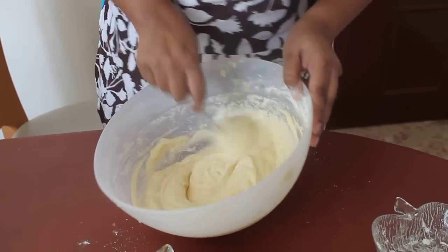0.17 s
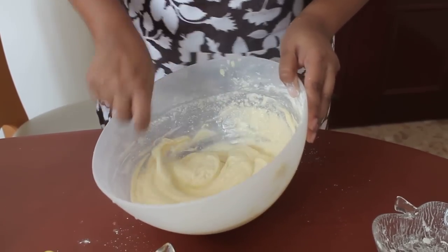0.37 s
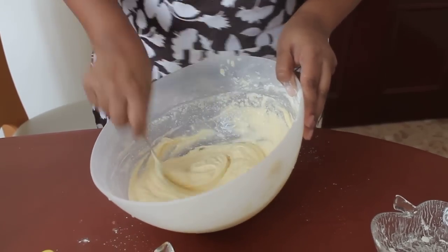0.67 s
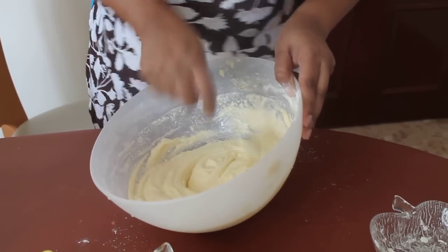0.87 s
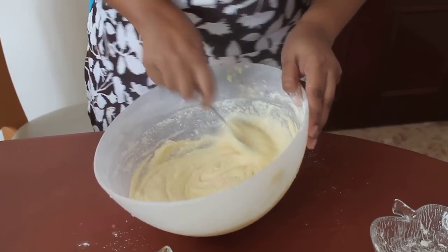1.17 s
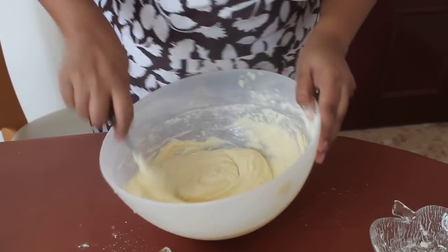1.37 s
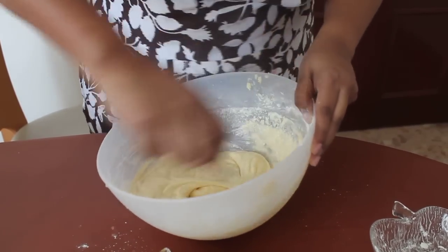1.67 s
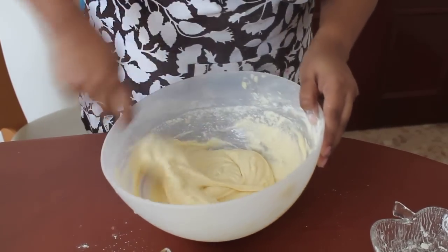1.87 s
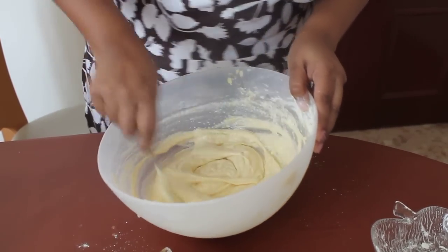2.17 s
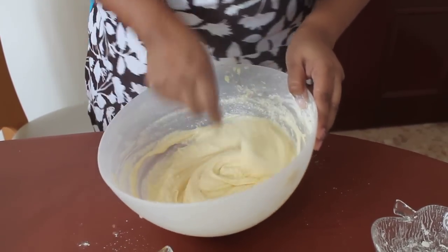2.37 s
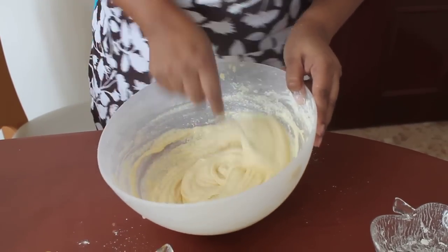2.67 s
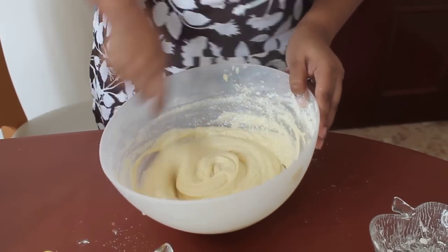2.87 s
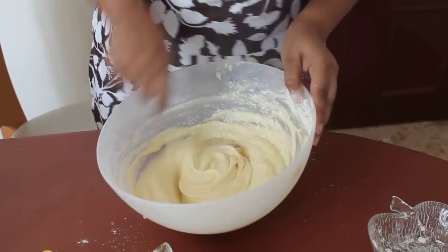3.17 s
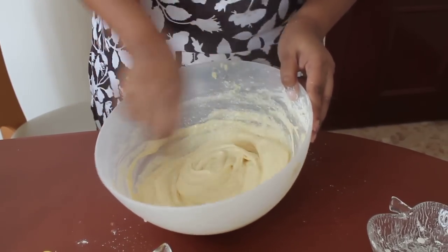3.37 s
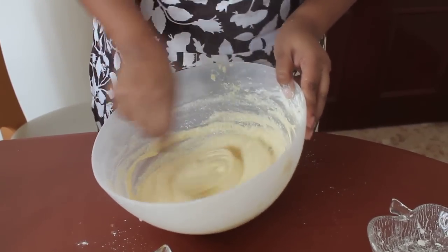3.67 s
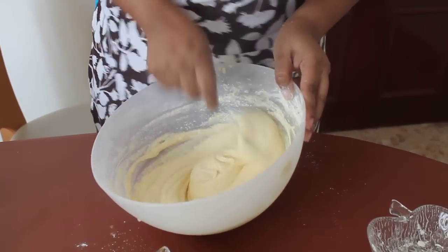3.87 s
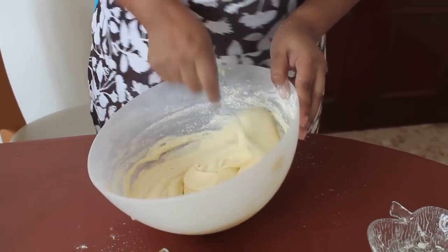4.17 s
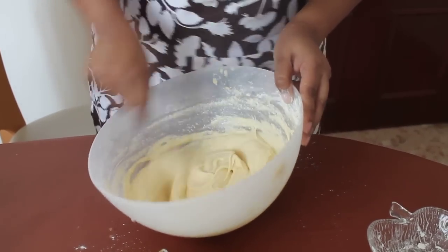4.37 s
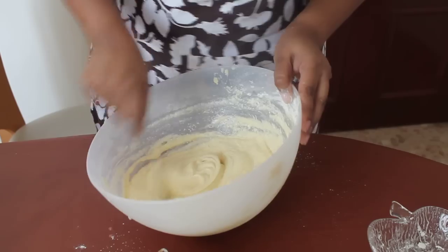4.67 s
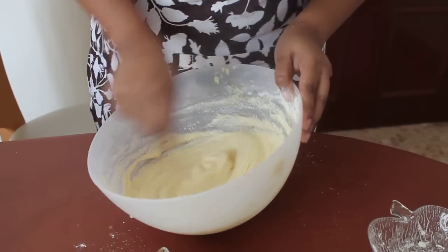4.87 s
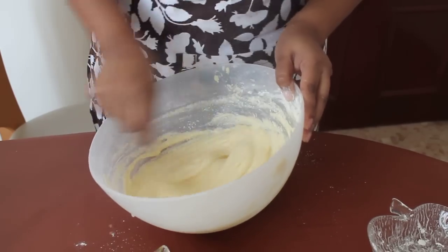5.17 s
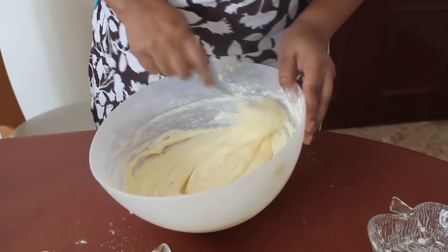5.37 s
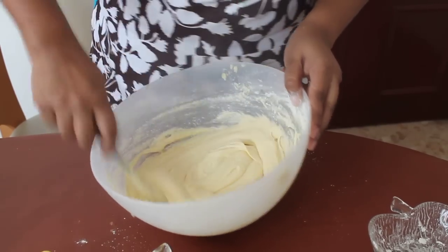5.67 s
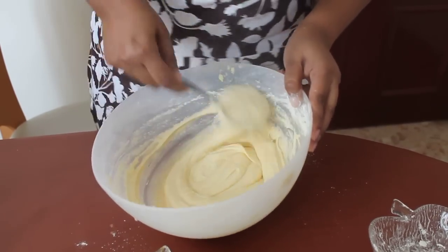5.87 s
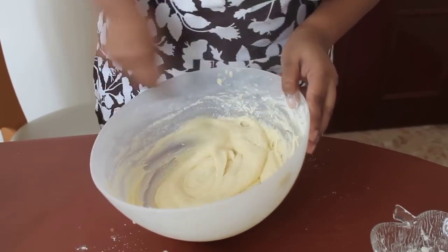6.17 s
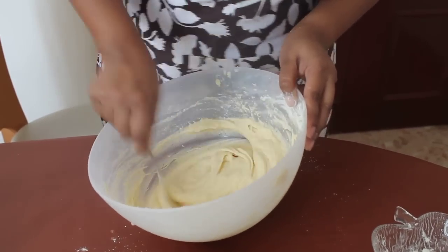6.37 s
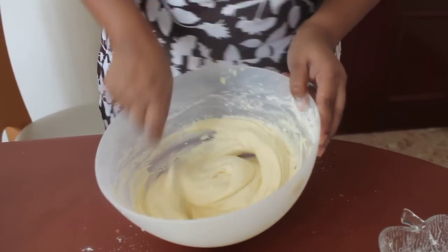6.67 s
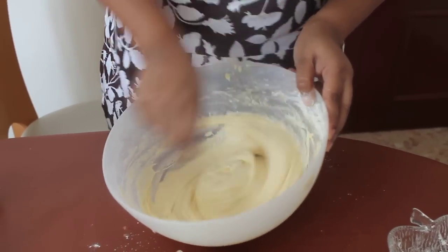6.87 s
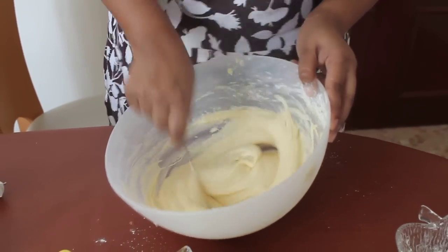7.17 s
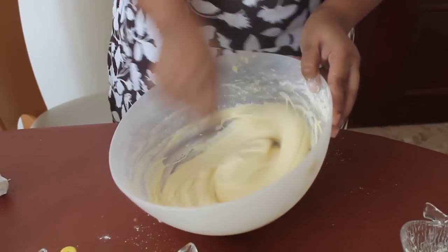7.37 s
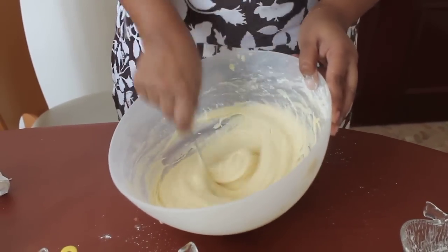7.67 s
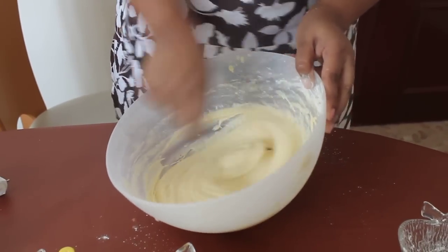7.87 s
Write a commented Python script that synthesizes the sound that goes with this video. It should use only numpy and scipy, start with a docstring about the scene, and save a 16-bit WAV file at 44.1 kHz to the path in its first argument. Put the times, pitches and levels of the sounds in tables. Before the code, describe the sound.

Thick batter squelches and crackles as a spoon stirs it briskly, knocking against a plastic bowl in an echoing kitchen.

```python
"""A metal spoon knocks around a plastic bowl of thick batter, about three turns a second, harder toward
the end. After each knock the spoon drags on: sticky films tear with a crackle, and an air pocket opens
behind it with a squelch. Smacks, small pops and three slow scrapes come in between, and the bowl bumps
the table once. A bare kitchen echoes it all over a faint, steady hush."""
import sys
import numpy as np
from scipy import signal
from scipy.fft import rfft, irfft, next_fast_len
from scipy.io import wavfile
from scipy.ndimage import uniform_filter1d, map_coordinates

SR = 44100
rng = np.random.default_rng(int(sys.argv[2]) if len(sys.argv) > 2 else 0)


def store_pcm(level_fs):
    """Save levels as 16-bit WAV."""
    pcm = np.round(np.clip(level_fs, -1, 1) * 32767).astype(np.int16)
    wavfile.write(sys.argv[1], SR, np.atleast_2d(pcm).T)


N = 354123

# The tones of the bowl's wall: pitch_ratio, level_db, ring_s (time to fade by 60 dB)
BOWL_TONES = [(.58, -10.5, 0.042), (.75, -2.5, 0.018), (1, -2, 0.041), (1.42, -4, 0.0097),
              (2.6, -12.5, 0.045)]
# Each knock and the drag after it; depth runs from 0 (skimming) to 1 (buried):
# start_s, knock_db, hardness_db, bowl_pitch_hz, speed_up_s, drag_db, depth
STROKES = [(0.149, -19.5, 4, 492, 0.011, -24.5, 0.04), (0.486, -21.5, 11.5, 587, 0.056, -22.5, 0.39),
           (0.8473, -15, -7, 672, 0.019, -23.5, 0.21), (1.2133, -15, -3, 476, 0.011, -36, 0.2),
           (1.684, -25.5, 15, 475, 0.024, -36, 0.05), (2.3708, -13, 3, 456, 0.015, -20, 0.44),
           (2.6936, -15.5, 7, 430, 0.019, -23.5, 0.42), (2.9241, -23.5, 7, 640, 0.018, -23, .15),
           (2.986, -28, 15, 570, 0.017, -12.5, 0.52), (3.2594, -24, 12.5, 665, 0.03, -15.5, 0.34),
           (3.5643, -16, -7, 638, .034, -15.5, 0.38), (3.7898, -21, -5, 374, 0.054, -26.5, 0.45),
           (3.846, -20, -6, 655, 0.049, -11.5, 0.6), (4.1244, -24, 9, 686, 0.043, -11.5, 0.42),
           (4.4748, -13, 5, 496, 0.043, -18.5, 0.45), (4.8112, -9.5, 1.5, 450, 0.025, -15, 0.93),
           (5.0978, -13, 0.5, 436, 0.016, -22.5, 0.43), (5.4062, -18.5, 0, 446, 0.037, -40, 0.07),
           (6.4807, -19, -6, 454, 0.028, -21.5, 0.54), (6.518, -17, 8, 622, 0.024, -11.5, 0.39),
           (6.7231, -24, -3, 383, 0.0443, -28, 0.47), (6.8, -16.5, 5, 451, 0.016, -15, 0.32),
           (6.9911, -16, -1, 592, 0.057, -23.5, 0.57), (7.0671, -11.5, 6, 497, 0.015, -16, 0.26),
           (7.2456, -17.5, -5, 377, 0.071, -27.5, 0.28), (7.3172, -12, 6.5, 505, 0.0248, -14, 0.43),
           (7.4724, -17, 1, 508, 0.11, -26.5, 0.3), (7.5714, -10.5, 10.5, 423, 0.02, -17.5, .9),
           (7.7216, -15.5, 3, 484, 0.065, -25.5, 0.73), (7.8129, -8, 2.5, 474, 0.032, -18.5, .78),
           (7.9538, -17, 6, 476, 0.012, -23, 0.36)]
def knocks():
    """The spoon hits and the wall rings briefly. Hard hits crack and clack; batter-cushioned ones thud."""
    out, t = np.zeros(N), np.arange(4096) / SR
    for start_s, knock_db, hardness_db, bowl_hz, *_ in STROKES:
        crack = cut(rng.standard_normal(len(t)), "low", hz=6400, order=1)
        crack *= amp(hardness_db - 6.5 - 60 * t / 0.028)
        clack_hz = 1593 * np.exp(0.17 * rng.standard_normal())
        clack = amp(6.5 + 0.37 * hardness_db) * ring(t, clack_hz, ring_s=0.0062)
        contact = amp(4) * cut(clack + crack, "high", hz=620, order=2)
        thud = amp(-10 - 0.22 * hardness_db) * ring(t, hz=237, ring_s=0.023)
        thud = cut(thud, "high", hz=131, order=2)
        uneven_db = 1.5 * rng.standard_normal(len(BOWL_TONES))
        wall = sum((-1) ** k * amp(level_db + uneven_db[k]) * ring(t, ratio * bowl_hz, ring_s)
                   for k, (ratio, level_db, ring_s) in enumerate(BOWL_TONES))
        add(out, start_s - .0001, amp(knock_db) * (contact + amp(6.5) * wall + thud))
    return out


def drags(t):
    """After each knock the spoon ploughs on. Skimming, it crackles; buried, it squelches lower."""
    next_knocks = [row[0] for row in STROKES[1:]] + [np.inf]
    for (start_s, _, _, _, speed_up_s, drag_db, depth), next_s in zip(STROKES, next_knocks):
        # the batter brakes the spoon, or a quick next knock cuts the drag short
        slow_down_s = min(.06, .8 * (next_s - start_s - speed_up_s))
        speed_db, shut = pull(t, speed_up_s, slow_down_s)
        squelch_db = drag_db + speed_db
        crackle_db = squelch_db + np.interp(depth, [0, 1], [2.5, -20])
        fizz_db = crackle_db - 4 - 0.6 * start_s  # less fizz as the flour gets wet
        open_hz = np.interp(depth, [0, 1], [1893, 1190])
        yield start_s, crackle_db, fizz_db, squelch_db, open_hz, shut


# The spoon pulls free: start_s, length_s, level_db
SMACKS = [(2.123, 0.057, -27), (2.485, 0.032, -26), (2.981, 0.0096, -21.5), (3.095, .032, -24.5),
          (3.351, 0.065, -31), (3.411, 0.045, -19.5), (4.243, 0.081, -29), (4.297, 0.051, -20),
          (5.44, 0.0226, -31), (5.836, 0.022, -26), (6.153, 0.016, -19), (7.149, 0.027, -25),
          (7.201, 0.02, -27)]
def smacks(t, rise_share=0.383, open_hz=1770):
    """A short, fizzy pull as the batter lets go of the spoon."""
    for start_s, length_s, level_db in SMACKS:
        speed_db, shut = pull(t, rise_share * length_s, (1 - rise_share) * length_s)
        crackle_db = level_db + speed_db
        fizz_db, squelch_db = crackle_db - 3.5, crackle_db - 1.5
        yield start_s, crackle_db, fizz_db, squelch_db, open_hz, shut


# Slow scrapes along the coated wall, one list of points each: time_s, effort_db
SCRAPES = [
    [(1.71, -39.5), (1.792, -19), (1.834, -25.5), (1.878, -24.5), (1.896, -22), (2.044, -26), (2.11, -41)],
    [(5.57, -41), (5.61, -29), (5.698, -21), (5.812, -20), (5.866, -32.5), (5.878, -59), (5.9, -48)],
    [(6.168, -34), (6.19, -14), (6.202, -23), (6.24, -17.5), (6.34, -41)],
]
def scrapes(t, opening_share=0.68, open_hz=1760):
    """A thin coat tears off the wall. Batter gathers on the spoon, so the squelch grows and drops lower."""
    for curve in SCRAPES:
        times_s, efforts_db = np.transpose(curve)
        start_s, length_s = times_s[0], times_s[-1] - times_s[0]
        effort_db = np.interp(start_s + t, times_s, efforts_db, right=-120)
        shut = np.clip(1 - t / (opening_share * length_s), 0, 1)
        crackle_db, fizz_db = effort_db - 1, effort_db - 3
        squelch_db = effort_db + np.interp(shut, [0, 1], [-9.5, -12])
        yield start_s, crackle_db, fizz_db, squelch_db, open_hz, shut


def pull(t, rise_s, fall_s):
    """The spoon speeds up, then slows: gives its level and how shut the pocket behind it is (0 to 1)."""
    times_s = np.cumsum([0, .002, abs(rise_s), abs(fall_s), .04])
    entry_db = -7 * np.sqrt(abs(rise_s) / 0.02)  # a slower pull starts more quietly
    speed_db = np.interp(t, times_s, [-90, entry_db, 0, -17, -90])
    opening_s = 0.102 * (rise_s + fall_s)
    shut = (1 - np.tanh((t - rise_s) / opening_s + 0.56)) / 2  # opens just before the fastest moment
    return speed_db, shut


def batter():
    """Drags, smacks and scrapes together make the batter crackle, squelch and churn."""
    crackle, fizz, squelch, pitch_sum, shut_sum = np.zeros((5, N))
    t = np.arange(SR // 2) / SR
    for start_s, crackle_db, fizz_db, squelch_db, open_hz, shut in [*drags(t), *smacks(t), *scrapes(t)]:
        suction = amp(squelch_db)
        add(crackle, start_s, amp(crackle_db))
        add(fizz, start_s, amp(fizz_db))
        add(squelch, start_s, suction)
        add(pitch_sum, start_s, suction * open_hz)
        add(shut_sum, start_s, suction * shut)
    weight = squelch + 1e-12  # where moves overlap, the louder one shapes the pocket more
    films = sticky_films(crackle, fizz)
    cells = air_cells(open_hz=pitch_sum / weight, shut=shut_sum / weight)
    return amp(0.26) * films + amp(-6.5) * squelch * cells + churning(squelch)


# The tone of the crackle: pitch_hz, level_db
CRACKLE_TONE = [(300, -52), (900, -38), (1400, -11), (3000, 2.5), (4100, -3), (5400, 3), (7000, -1),
                (8300, 0), (9500, -4.5), (12000, -36)]
# The tone of the finer, higher fizz: pitch_hz, level_db
FIZZ_TONE = [(5000, -39), (8500, -5.5), (10000, 0.5), (13000, 1), (16000, -6)]
def sticky_films(crackle, fizz):
    """Thin films of batter tear in clumps as the spoon moves."""
    clumps = unit(amp(1.7 * wobble(per_s=330) + 1.2 * wobble(per_s=70)))
    coarse = amp(0.5) * crackle * tearing(CRACKLE_TONE, spread_db=-2)
    fine = amp(-1.5) * fizz * tearing(FIZZ_TONE, spread_db=-1.5)
    return clumps * (coarse + fine)


def tearing(tone, spread_db):
    """Parting films make thousands of tiny clicks, heard through shifting folds of batter."""
    starts = rng.integers(0, N, size=26000)
    pitch_hz = rng.uniform(650, 15400, len(starts))
    clicks = tiny_rings(starts, pitch_hz, ring_s=0.0012, spread_db=spread_db, samples=64)
    return patchy(coloured(clicks, tone), depth_db=2.8)


def air_cells(open_hz, shut):
    """A shut pocket squeezes its air cells to all sizes; as it opens they sink to one vowel-like pitch."""
    starts = rng.integers(0, N, size=11000)
    octaves_up = 1.9 * shut[starts] * rng.uniform(.5, 1, len(starts))
    octaves_up += .13 * rng.standard_normal(len(starts))
    pitch_hz = np.clip(open_hz[starts] * 2 ** octaves_up, 300, 15000)
    cells = tiny_rings(starts, pitch_hz, ring_s=0.0086, spread_db=4, samples=288)
    return cut(cells, "high", hz=1020, order=3)


# How strongly the batter churns: time_s, level_db
CHURN_LEVELS = [(0, -45.5), (3.6, -57.5), (4.102, -36), (4.598, -46.5), (6.4, -45), (6.8, -36.5),
                (7.1, -34), (7.6, -30), (8.03, -33)]
# The tone of the churning: pitch_hz, level_db
CHURN_TONE = [(30, -12), (80, -27), (130, -17), (250, -11), (450, 1), (550, -6), (650, -2), (870, -5.5),
              (1250, 3), (2200, -7), (5000, -13), (16000, -27.5)]
def churning(squelch):
    """Each move shakes the whole mass of batter, and fast beating keeps it churning."""
    churn_db = np.interp(np.arange(N) / SR, *np.transpose(CHURN_LEVELS)) + 2 * wobble(per_s=70)
    return (amp(-8) * squelch + amp(churn_db)) * coloured(rng.standard_normal(N), CHURN_TONE)


# Air pockets bursting: start_s, level_db, pitch_hz
AIR_POPS = [(1.7556, 3, 3540), (1.9011, 12.5, 3400), (1.9547, 5, 3040), (2.3348, -7, 2850),
            (2.621, 2.5, 4300), (4.4312, -2, 7000), (4.6664, -1, 2050), (5.3721, -9.5, 7800),
            (5.8654, 3, 2230), (6.0265, 1.5, 3440), (6.189, 6.5, 5200), (6.196, 12, 5900),
            (6.9713, 4, 4650)]
def pops():
    """Trapped air snaps open with a short click; so small a source has no bass."""
    out, t = np.zeros(N), np.arange(512) / SR
    for start_s, level_db, pitch_hz in AIR_POPS:
        snap = cut(rng.standard_normal(len(t)), "low", hz=6000, order=1) * amp(-4 - 60 * t / .004)
        add(out, start_s, amp(level_db - 7) * (ring(t, pitch_hz, ring_s=0.0015) + snap))
    return cut(out, "high", hz=1310, order=2)


# The two low tones of one bump: start_s, level_db, pitch_hz, ring_s
BUMP_TONES = [(5.317, -26, 204, 0.1), (5.318, -35, 107, .25)]
def table_bump():
    """The bowl's foot thuds softly on the table top."""
    out, t = np.zeros(N), np.arange(SR // 2) / SR
    for start_s, level_db, pitch_hz, ring_s in BUMP_TONES:
        add(out, start_s, amp(level_db) * ring(t, pitch_hz, ring_s))
    return out


def surface_bubbles():
    """Tiny bubbles on the batter burst at random with faint ticks."""
    starts = rng.integers(0, N, size=60)
    pitch_hz = rng.uniform(3000, 14000, len(starts))
    ticks = tiny_rings(starts, pitch_hz, ring_s=.0012, spread_db=4, samples=96)
    return amp(-65) * cut(ticks, "high", hz=2000, order=2)


# Bounces off the table and nearest walls: delay_s, level_db
NEAR_ECHOES = [(.0085, -23.5), (0.013, -16.5), (0.014, -20.5), (0.022, -30), (0.031, -18), (.039, -28)]
def first_echoes(sound):
    """Each nearby surface sends back one slightly dull copy."""
    out, dull = np.zeros(N), cut(sound, "low", hz=2300, order=1)
    for delay_s, level_db in NEAR_ECHOES:
        add(out, delay_s, amp(level_db) * dull)
    return out


# How long the kitchen rings: pitch_hz, ring_s
ROOM_RING = [(150, 0.89), (400, 0.58), (1040, 0.5), (2760, 0.57), (7280, 0.56), (15000, 0.32)]
# The tone of its echo: pitch_hz, level_db
ROOM_TONE = [(100, -8), (450, 3), (680, 8.5), (880, -2.5), (1200, -1.5), (1650, 0), (3500, -5.5),
             (8000, -9.5), (15000, -11.5)]
# Notes that build up between the walls (standing waves): pitch_hz, level_db, ring_s
ROOM_NOTES = [(123.8, 3.5, 1), (182.4, 3, 0.93), (377, 0, 0.8), (406, -10.5, 1), (457, 5, 0.63),
              (531, -2, 1), (645.7, 8, 0.54), (721, -0.5, 0.86)]
def kitchen(sound):
    """Hard walls answer. The echo pattern changes as spoon and bowl move; the room's own notes stay."""
    out, t = np.zeros(N), np.arange(28672) / SR
    band_hz, time_s, _ = signal.stft(t, SR, nperseg=256)
    fade = amp(-60 * time_s / value_at(ROOM_RING, band_hz)[:, None])
    band_energy = np.mean(fade ** 2, axis=1, keepdims=True) * len(t)
    fade *= amp(value_at(ROOM_TONE, band_hz))[:, None] / np.sqrt(band_energy)
    hop = SR // 14
    padded, window = np.pad(sound, (hop, 2 * hop)), signal.windows.cosine(2 * hop)
    for i in range(0, N, hop):  # each overlapping slice gets its own tail of fading noise
        noise_bands = signal.stft(rng.standard_normal(len(t)), nperseg=256)[2]
        tail = signal.istft(noise_bands * fade, nperseg=256)[1]
        echo = signal.fftconvolve(padded[i:i + 2 * hop] * window, tail)
        add(out, (i - hop) / SR + .004, echo[max(hop - i, 0):])
    notes = sum(amp(level_db) * ring(t, hz, ring_s) for hz, level_db, ring_s in ROOM_NOTES)
    return out + amp(-58) * signal.fftconvolve(sound, notes)[:N]


# The tone of the background: pitch_hz, level_db
HUSH_TONE = [(15, -49), (25, -26), (102, -11), (130, -2), (166, -1), (301, 3.5), (373, 0), (840, -1.5),
             (1790, -36), (4140, -50.5), (4870, -63), (10100, -26.5), (16000, -63)]
def room_hush():
    """A faint, low noise whose level wavers slightly."""
    return amp(-44 + 0.57 * wobble(per_s=6)) * coloured(rng.standard_normal(N), HUSH_TONE)


def amp(db):
    """Turn decibels into a gain."""
    return 10 ** (np.asarray(db) / 20)


def unit(x):
    """Scale to an average (rms) level of 1."""
    return x / np.sqrt(np.mean(x ** 2) + 1e-20)


def add(track, start_s, sound):
    """Mix a sound into a track."""
    i = max(round(start_s * SR), 0)
    track[i:i + len(sound)] += sound[:max(len(track) - i, 0)]


def ring(t, hz, ring_s):
    """A pure tone that fades by 60 dB in ring_s."""
    return np.sin(2 * np.pi * hz * t) * amp(-60 * t / ring_s)


def tiny_rings(starts, hz, ring_s, spread_db, samples):
    """Many short tones of uneven strength, one at each start sample."""
    offsets = np.arange(samples)
    strength = amp(spread_db * np.minimum(rng.exponential(size=len(starts)), 5))
    strength *= rng.choice([-1, 1], len(starts))
    tones = strength[:, None] * ring(offsets / SR, hz[:, None], ring_s)
    positions = starts[:, None] + offsets
    return unit(np.bincount(positions.ravel(), tones.ravel(), N + samples)[:N])


def wobble(per_s):
    """A smooth curve through per_s random values a second."""
    values = rng.standard_normal(int(N * per_s / SR) + 4)
    return map_coordinates(values, [np.arange(N) * per_s / SR])


def patchy(x, depth_db):
    """Make random patches of pitch swell and fade briefly."""
    bands = signal.stft(x, nperseg=256)[2]
    patches = rng.standard_normal(bands.shape)
    for _ in range(2):
        patches = uniform_filter1d(uniform_filter1d(patches, size=9, axis=0), size=4, axis=1)
    return unit(signal.istft(bands * amp(depth_db * unit(patches)), nperseg=256)[1][:N])


def value_at(table, hz):
    """Read between the rows of a (pitch_hz, value) table, on a log pitch scale."""
    pitches_hz, values = np.transpose(table)
    return np.interp(np.log(hz + 1), np.log(pitches_hz + 1), values)


def cut(x, keep, hz, order):
    """Keep the "low" or "high" side of hz; a higher order cuts more steeply."""
    return signal.sosfilt(signal.butter(order, hz, keep, fs=SR, output="sos"), x)


def filtered(x, gain_at):
    """Scale each frequency by gain_at(hz)."""
    size = next_fast_len(len(x) + 8192)
    return irfft(rfft(x, size) * gain_at(np.fft.rfftfreq(size, 1 / SR)), size)[:len(x)]


def coloured(x, tone):
    """Shape a sound with a tone table, then scale it to level 1."""
    return unit(filtered(x, lambda hz: amp(value_at(tone, hz))))


def scene():
    """Spoon, bowl and batter in the kitchen, over its steady hush."""
    direct = knocks() + pops() + batter() + surface_bubbles() + table_bump()
    direct = cut(direct, "high", hz=116, order=2)  # trim the low rumble from all the direct sounds
    hush = room_hush()
    in_room = direct + first_echoes(direct) + amp(-0.73) * kitchen(direct)
    return (amp(-2) * in_room + hush)[None]


def record(dry):
    """Round off the loudest peaks and remove the very highest treble."""
    peak_limit, top_hz = .8, 15900
    rounded = dry[0] / (1 + (np.abs(dry[0]) / peak_limit) ** 6) ** (1 / 6)
    return filtered(rounded, lambda hz: 1 / (1 + (hz / top_hz) ** 200))[None]


dry = scene()
out = record(dry)
store_pcm(out)
```